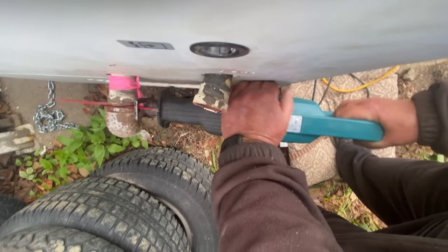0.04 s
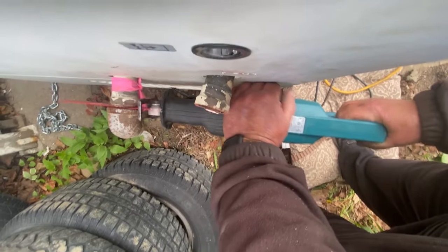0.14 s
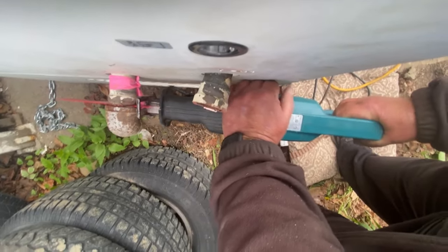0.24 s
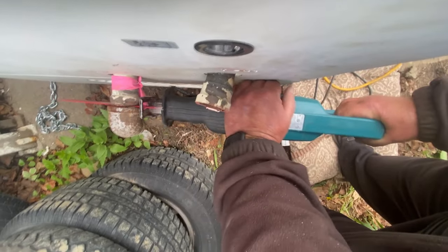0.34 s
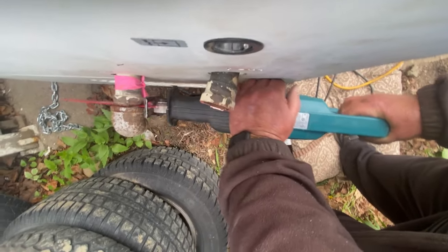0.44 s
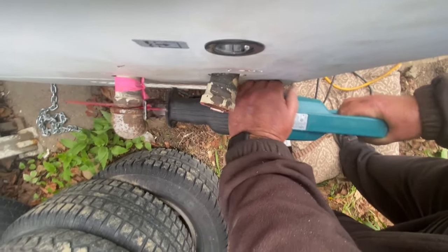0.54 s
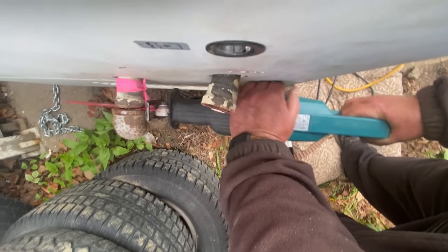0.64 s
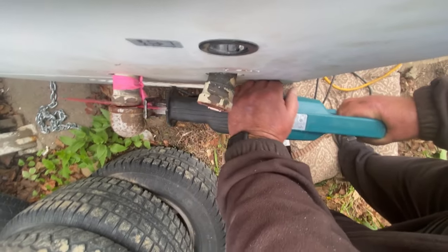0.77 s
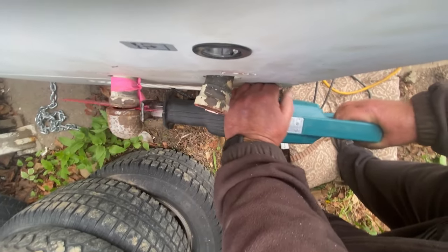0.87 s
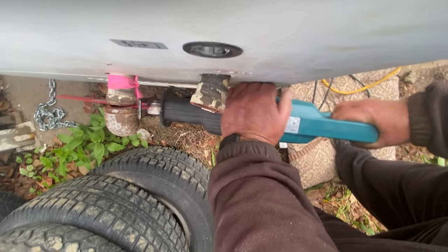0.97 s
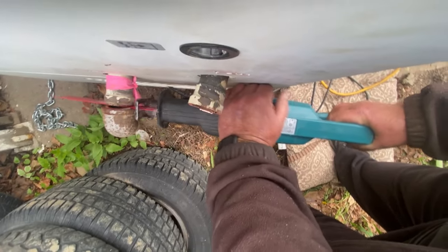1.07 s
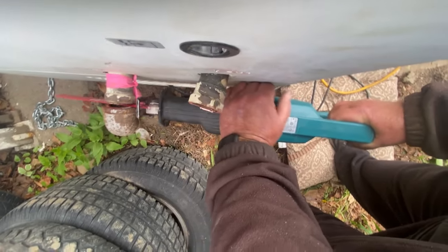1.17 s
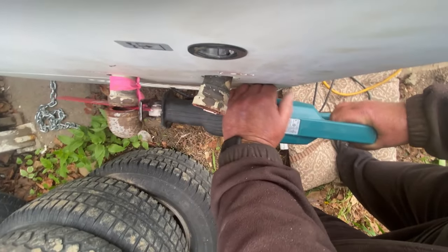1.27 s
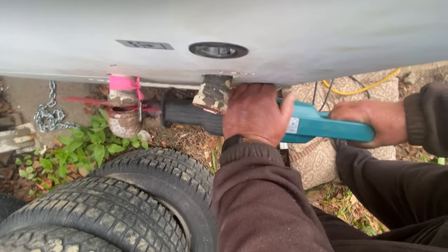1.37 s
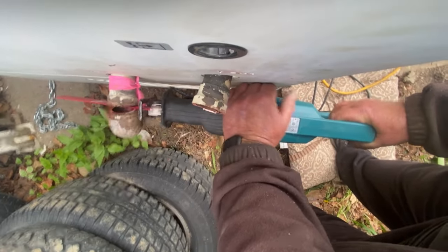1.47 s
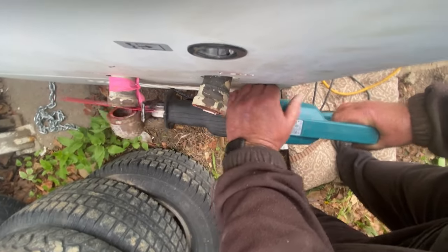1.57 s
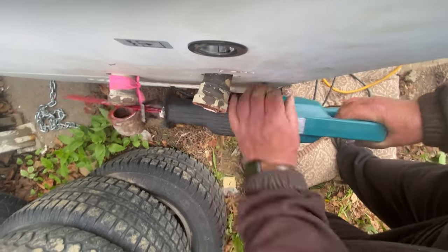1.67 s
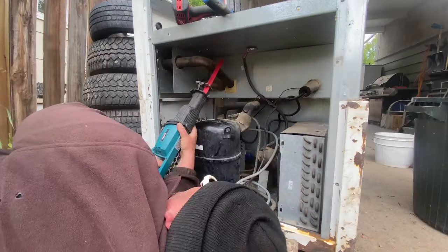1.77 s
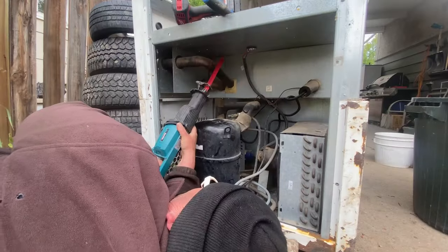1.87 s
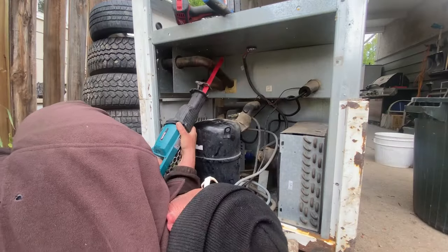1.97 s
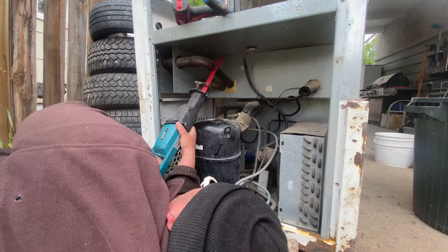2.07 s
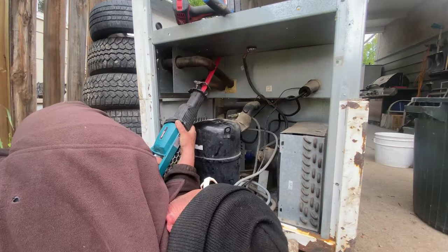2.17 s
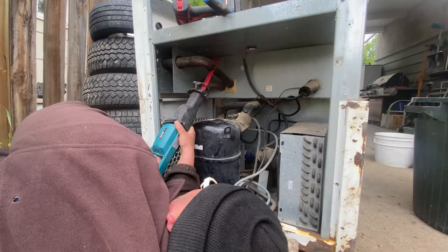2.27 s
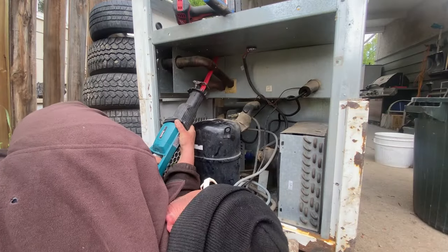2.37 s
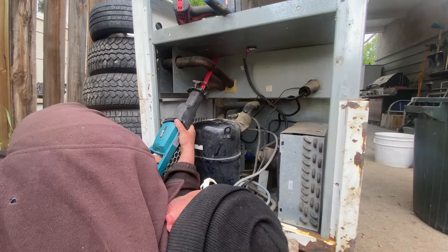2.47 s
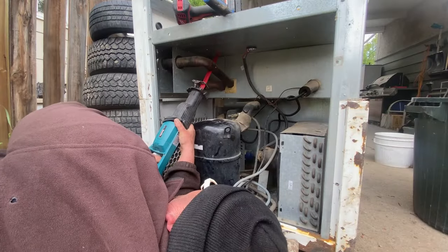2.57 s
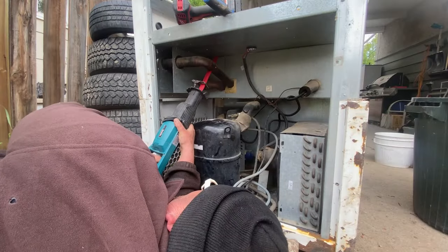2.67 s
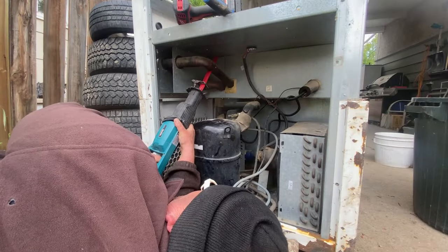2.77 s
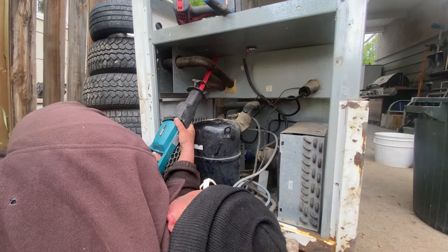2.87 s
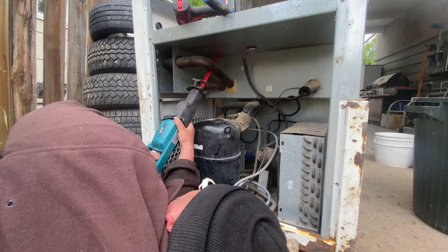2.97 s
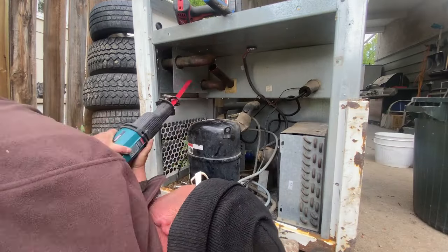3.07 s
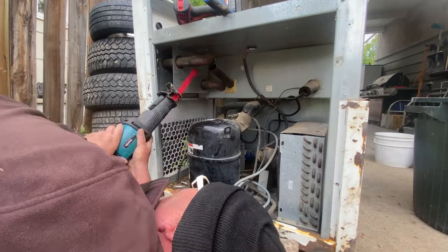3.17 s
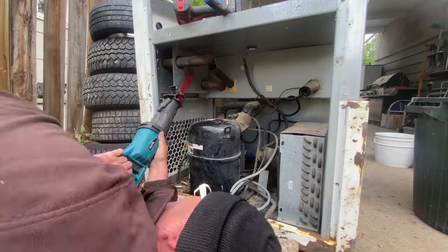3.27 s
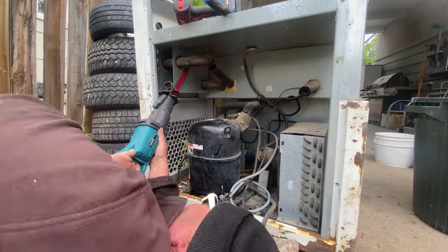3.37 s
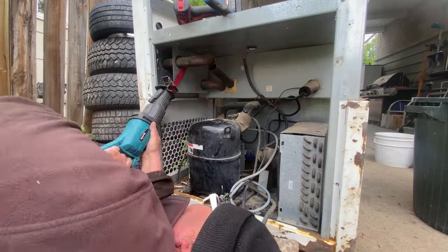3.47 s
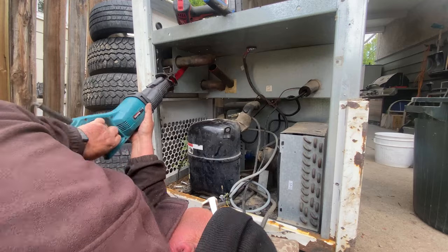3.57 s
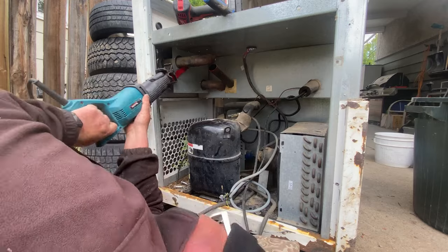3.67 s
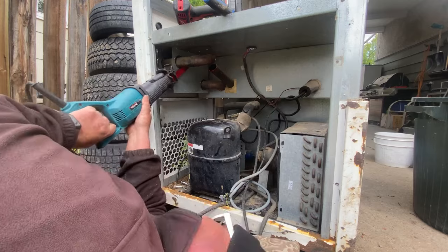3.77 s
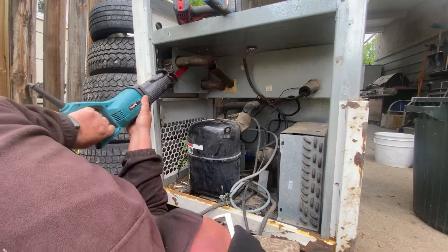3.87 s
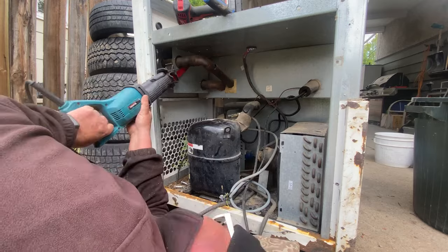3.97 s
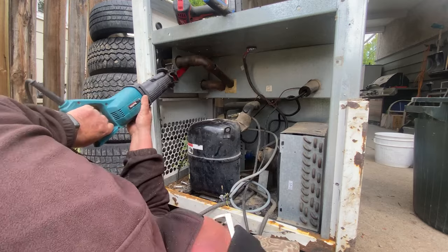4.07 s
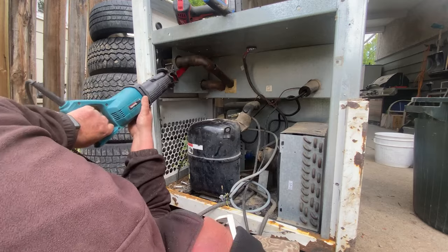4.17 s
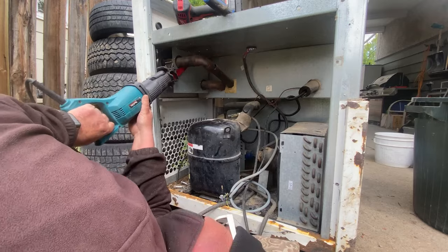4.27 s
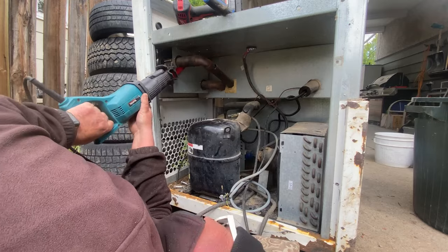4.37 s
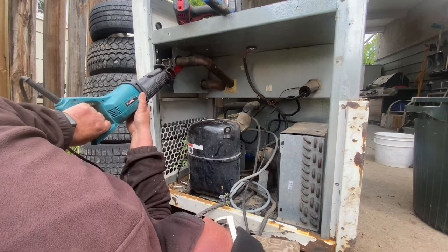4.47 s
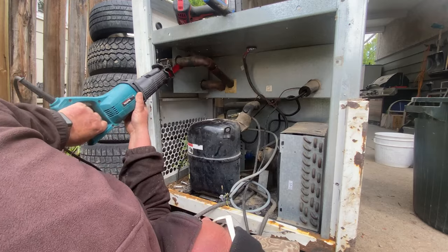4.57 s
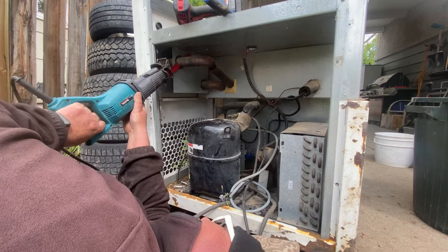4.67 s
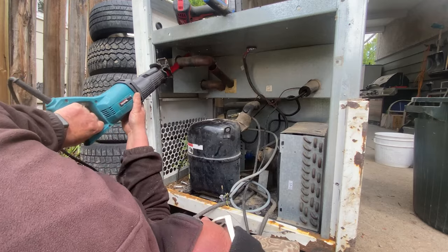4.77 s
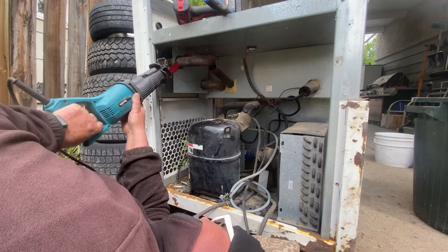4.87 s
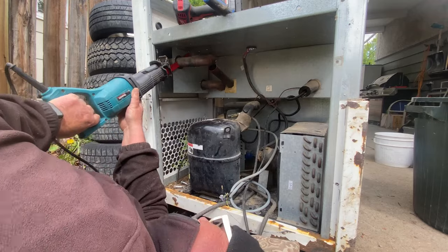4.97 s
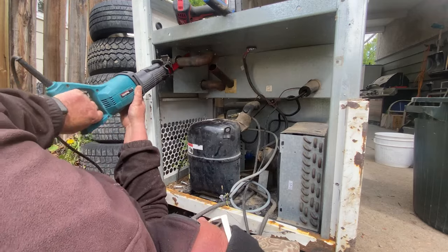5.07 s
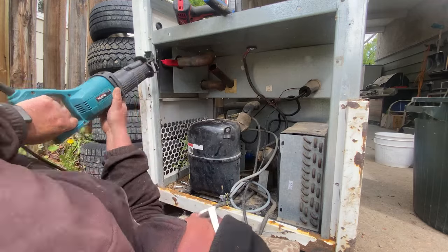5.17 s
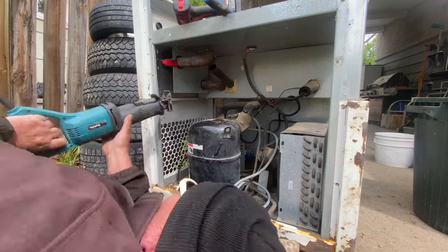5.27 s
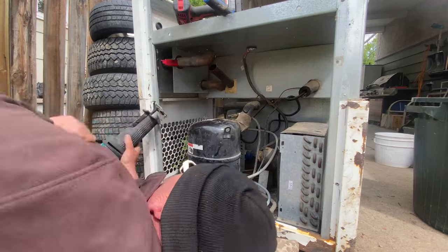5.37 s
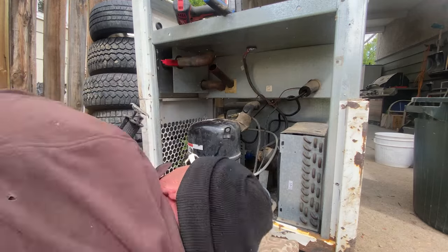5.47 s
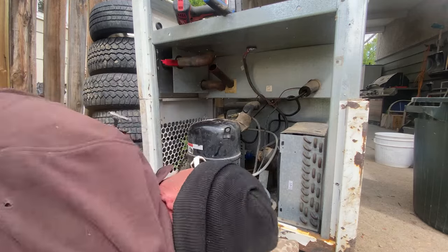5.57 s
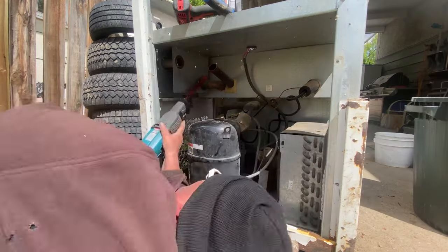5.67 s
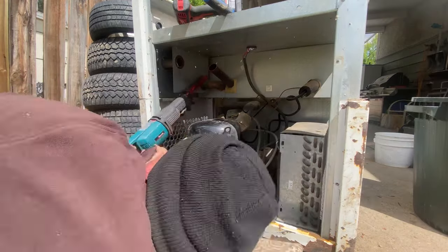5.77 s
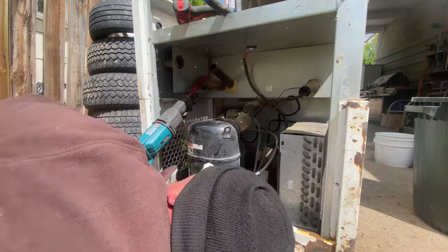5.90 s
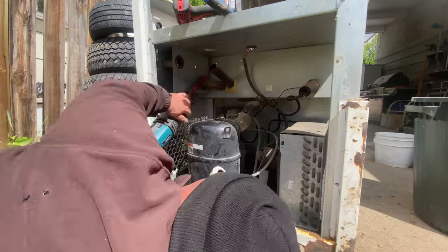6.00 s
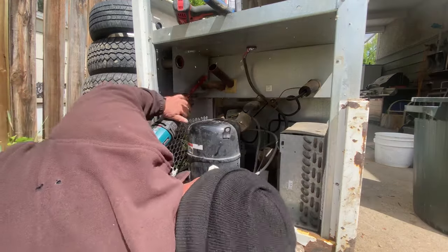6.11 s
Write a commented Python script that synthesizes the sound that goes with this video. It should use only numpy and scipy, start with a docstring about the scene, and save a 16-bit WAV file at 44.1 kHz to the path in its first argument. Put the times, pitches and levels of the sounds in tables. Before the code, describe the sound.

A power reciprocating saw buzzes and grinds through metal pipes in three bursts, with squeals, blade knocks, a whirring coast-down and abrupt cuts.

```python
"""A reciprocating saw, played back fast, cuts three metal pipes outdoors: first beside a tank, then twice in a
steel cabinet. Each stroke jolts the pipe into a buzz of overtones; the teeth grind and the motor hisses as
coloured, gritty noise, and bands of noise squeal. After a cut, rattle, brush hiss and fan air coast down.
Between cuts the blade scrapes, rings a hollow part and knocks on metal; abrupt cut-offs leave short silences."""
import sys
import numpy as np
from scipy import signal
from scipy.fft import rfft, irfft, next_fast_len
from scipy.io import wavfile
from scipy.ndimage import uniform_filter1d

SR = 44100
rng = np.random.default_rng(int(sys.argv[2]) if len(sys.argv) > 2 else 0)


def int16_out(signal):
    """Quantize to a 16-bit WAV file."""
    q = np.round(np.clip(np.atleast_2d(signal).T, -1, 1) * 32767)
    wavfile.write(sys.argv[1], SR, q.astype(np.int16))


N = 270774  # length in samples


def amp(db):
    """Turns decibels into a gain."""
    return 10 ** (np.asarray(db) / 20)


def evened(x):
    """Scales each row to rms 1."""
    return x / np.sqrt(np.mean(x ** 2, axis=-1, keepdims=True) + 1e-20)


def read(points, hz, column=1):
    """Reads a table column at any frequency, interpolating along log frequency."""
    table = np.transpose(points)
    return np.interp(np.log(hz + 1), np.log(table[0] + 1), table[column])


def unfold(rows):
    """Start time, and every other column at each sample."""
    s, *columns = np.transpose(rows)
    t = np.arange(s[0], s[-1], 1 / SR)
    return s[0], [np.interp(t, s, column) for column in columns]


def faded(x, samples=90):
    """Softens both ends."""
    i = np.arange(x.shape[1])
    return x * np.minimum(1, np.minimum(i, i[::-1]) / samples)


def add(mix, s, sound):
    """Lays a sound into the mix from s seconds, trimmed at the end."""
    part = mix[:, round(s * SR):][:, :sound.shape[1]]
    part += sound[:, :part.shape[1]]


def drift(rows, n, per_s):
    """Random wander of rms about 1, with per_s new targets a second."""
    knots = rng.standard_normal((rows, 400))
    position = np.arange(n) * per_s / SR
    return np.array([np.interp(position, np.arange(400), k) for k in knots]) * np.sqrt(1.5)


def gritty(n, spread_db):
    """Two unrelated noises whose samples now and then jump, as teeth catch."""
    jumps = np.minimum(rng.exponential(1, (2, n)), 6)
    return rng.standard_normal((2, n)) * amp(spread_db * jumps)


def coloured(x, spectrum):
    """Filters x by the spectrum and scales it to rms 1."""
    size = next_fast_len(x.shape[1] + 2048)
    gain = amp(read(spectrum, np.fft.rfftfreq(size, 1 / SR)))
    return evened(irfft(rfft(x, size) * gain, size)[:, :x.shape[1]])


def patchy(x, depth_db):
    """Resonances come and go: random patches of colour over time and pitch."""
    z = signal.stft(x, nperseg=512)[2]
    patches = uniform_filter1d(rng.standard_normal(z.shape[1:]), size=3, axis=0)  # along pitch
    patches = uniform_filter1d(patches, size=14, axis=1)  # along time
    z = z * amp(depth_db * patches / patches.std())
    return evened(signal.istft(z, nperseg=512)[1][:, :x.shape[1]])


def resonate(x, hz, width):
    """One resonance: shifts hz down to zero, smooths, shifts back."""
    turn = np.exp(2j * np.pi * np.cumsum(hz * np.ones(x.shape[1])) / SR)
    r = np.exp(-np.pi * width / SR)
    return 2 * (turn * signal.lfilter([1 - r], [1, -r], x / turn)).real


# Buzz of each pipe: level/dB of multiples 1, 2, 3 .. of the stroke rate, relative to the buzz level.
TANK_BUZZ = [-40, -5.5, 4.5, 3, -2, -15.5, 0.5, -7.5, -13.5, -10, -8, -11.5, -7.5, -12, -5.5, -8.5, -6, -12,
             -8.5, -6.5]
FIRST_BUZZ = [-19, -18.5, -16.5, -11, 2.5, -17, -8.5, -13.5, -5, -11, -11, -9.5, -16, -23, -20.5, -13, -12,
              -14.5, -13]
SECOND_BUZZ = [-19.5, -12, -7, -13.5, 0.5, -9.5, -18, -13.5, -8, -11.5, -12.5]
MOST_LIFT_DB = 7.5


def buzz(s, hz, turns, buzz_db, balance, overtones):
    """One jolt a stroke excites the overtones; the pipe shifts, so each swells and slips in phase."""
    even_db, lift, _, rough = balance
    upper_db = np.minimum(lift * (even_db - buzz_db), MOST_LIFT_DB)
    n = len(hz)
    t = s + np.arange(n) / SR
    tone = np.zeros((2, n))
    for k, db in enumerate(overtones, start=1):
        tilt_db = upper_db / (1 + (6.3 / k) ** 8)  # reaches mainly multiples 7 and up
        level = amp(buzz_db + db + tilt_db + swell(t, k * hz) + 2.2 * drift(2, n, 6))
        slip = .012 * k * k + .06 * drift(2, n, 3) + rough * np.sqrt(k) * drift(2, n, 50)  # turns
        path = [[0], [rng.random()]]  # the second path has its own phase
        tone += np.sqrt(2) * level * np.cos(2 * np.pi * (k * turns + slip + path))
    return tone


# Colour of the teeth on each pipe: f/Hz, relative level/dB (per Hz).
TANK_GRIND = [(40, -48.5), (250, -39), (420, -17.5), (1300, -12), (2100, -11), (2950, -2.5), (4000, -10),
              (5000, -17), (9000, -50)]
FIRST_GRIND = [(110, -59), (200, -23.5), (800, -12.5), (1550, -11.5), (1900, -1.5), (2900, 0), (3700, 1.5),
               (7000, -3.5), (10000, -15)]
SECOND_GRIND = [(110, -62.5), (200, -23.5), (900, -9.5), (1400, -7.5), (2100, -0.5), (3300, -0.5),
                (6000, -3.5), (10000, -15.5)]


def teeth(grind_db, stroke, flutter, colour):
    """Grinding: gritty noise that surges with each stroke and flutters in level."""
    grit = gritty(len(stroke), 1.3) * (1 + 0.33 * stroke)
    return patchy(coloured(grit, colour), depth_db=2.1) * amp(grind_db - 2.0) * flutter


# Colour of motor fan and brushes at each place: f/Hz, relative level/dB (per Hz).
TANK_HISS = [(2350, -37), (4000, -8.5), (5710, -3), (9620, -1), (11400, -5.5), (15100, -4.5),
             (16200, -25.5), (16500, -59)]
CABINET_HISS = [(2350, -48), (4000, -19), (4860, 2), (6500, -1), (9790, 2), (14800, -0.5), (16200, -9),
                (16500, -44)]
FULL_GRIND_DB = -30.5  # below this grind level the hiss sinks with it


def motor(motor_db, grind_db, stroke, flutter, colour):
    """Fan and brush hiss: gritty noise that surges and flutters less than the teeth."""
    hiss_db = motor_db + np.minimum(grind_db - FULL_GRIND_DB, 0)
    grit = gritty(len(stroke), 2.0) * (1 + 0.18 * stroke)
    return patchy(coloured(grit, colour), depth_db=2.5) * amp(hiss_db - 0.42) * flutter ** 0.46


# Stretches of sawing: t/s, stroke rate f/Hz, buzz level/dB, grind level/dB (before trim and flutter).
TANK_CUT = [(0, 164.4, -45, -29.5), (.06, 165.4, -40, -21), (.28, 164.2, -37, -27),
            (.38, 159.7, -38, -28.5), (.47, 160.3, -39.5, -26.5), (.56, 166, -37, -26),
            (1.0, 165.6, -35, -25.5), (1.22, 167.4, -37.5, -24.5), (1.3, 171.6, -37, -23.5),
            (1.34, 157.5, -44.5, -29), (1.37, 153.1, -44.5, -30), (1.385, 149.1, -59.5, -60),
            (1.48, 137.3, -59, -70), (1.56, 127.8, -75, -80)]
FIRST_CUT = [
    [(1.729, 201, -59, -45), (1.742, 201, -38.5, -33), (1.804, 203.4, -37, -31.5), (1.822, 203.3, -86, -68)],
    [(1.879, 198.6, -37, -31), (2.04, 194.6, -38.5, -28), (2.3, 192.2, -42.5, -27),
     (2.6, 196.5, -40.5, -29.5), (2.79, 199.8, -44.5, -30.5), (2.95, 196.2, -46.5, -34.5),
     (3.07, 196.6, -45.5, -29), (3.105, 196, -67, -45)],
]  # two stretches
SECOND_CUT = [(3.73, 196.4, -80, -58), (3.82, 198.2, -77, -46), (3.9, 194.4, -66, -38.5),
              (3.94, 195.5, -59, -30), (4.05, 200.8, -52, -24.5), (4.3, 202.6, -40.5, -21.5),
              (4.43, 192.6, -46.5, -31.5), (4.5, 200.5, -48, -29.5), (4.75, 206.2, -47.5, -30),
              (5.145, 209.9, -52.5, -32), (5.165, 212, -74, -44), (5.21, 210, -83, -54)]
# Each cut: buzz level/dB where upper overtones get no lift, their lift in dB for each dB the buzz sinks,
# motor hiss level/dB at full grind (before trim and flutter), phase roughness/turns.
TANK_BALANCE = (-35, 2, -32, 0.02)
FIRST_BALANCE = (-39.5, 1.5, -29, 0.03)
SECOND_BALANCE = (-50.5, -2.8, -29.5, 0.1)


def saw(rows, balance, overtones, grind, hiss):
    """Buzz, grind and hiss of one stretch share strokes; two like-sounding rows, as heard along two paths."""
    s, (hz, buzz_db, grind_db) = unfold(rows)
    n = len(hz)
    turns = np.cumsum(hz * (1 + .002 * drift(1, n, 58.2)[0])) / SR
    flutter = amp(1.54 * drift(1, n, 45.38))  # quick and random
    stroke = np.exp(0.8 * np.cos(2 * np.pi * turns))  # teeth cut hardest at the jolt
    tone = buzz(s, hz, turns, buzz_db, balance, overtones)
    grinding = teeth(grind_db, stroke, flutter, grind)
    hissing = motor(balance[2], grind_db, stroke, flutter, hiss)
    return s, faded(tone + grinding + hissing)


# Bands of noise, narrow to broad, steady or sliding (squeals, a low thump, lingering hiss):
# start t/s, end t/s, start f/Hz, end f/Hz, width f/Hz, level/dB (before flutter and fades).
SQUEALS = [(0.019, 0.304, 2500, 2500, 510, -31.5), (1.75, 1.82, 6140, 5960, 300, -31),
           (.05, 0.2, 160, 180, 39, -48.5), (1.5, 1.6, 320, 385, 16, -56),
           (5.3, 5.63, 7800, 9100, 1600, -55), (1.879, 2.332, 6200, 6130, 420, -29),
           (1.922, 2.1, 5330, 5100, 250, -34.5), (1.987, 2.16, 12140, 11500, 400, -33.5),
           (2.125, 2.335, 10500, 9500, 500, -35.5), (2.199, 2.305, 4500, 4300, 149, -33.5),
           (2.353, 2.604, 10700, 8100, 300, -38), (2.396, 2.57, 4850, 4640, 300, -33),
           (2.664, 3.06, 10250, 10000, 350, -36), (2.656, 2.918, 3000, 3400, 130, -39.5),
           (5.046, 5.167, 1960, 1830, 530, -35.5), (3.745, 4.42, 3300, 3530, 420, -32),
           (3.91, 4.43, 1970, 2040, 800, -26.5), (3.95, 4.428, 9700, 9730, 400, -36),
           (4.355, 4.632, 12300, 11600, 600, -33)]


def squeal(s, end, start_hz, end_hz, width, db):
    """Fluttering noise through one resonance, passed twice, that holds its pitch or slides."""
    n = round((end - s) * SR)
    hz = np.linspace(start_hz, end_hz, n)
    grit = np.diff(gritty(n, 2.5), 2, prepend=0, append=0)  # differencing thins the lows
    ring = resonate(resonate(grit, hz, width), hz, width)
    return s, amp(db + 1.6 * drift(1, n, 40)) * evened(ring) * signal.windows.tukey(n, .2)


# Buzz bands that swell or sink as the pipe shifts: start t/s, end t/s, centre f/Hz, width f/Hz,
# level change/dB at the centre.
SWELLS = [(.32, .52, 1290, 100, 9.5), (.32, .52, 1120, 66, -10), (2.67, 2.97, 1940, 430, 8),
          (2.3, 3.08, 3700, 120, 11.5), (4.93, 5.16, 720, 100, 11), (2.823, 3.107, 1000, 150, -8.5),
          (4.97, 5.2, 1040, 100, -6), (4.52, 4.98, 1255, 150, 7.5)]
SWELL_S = 0.042  # ramp in and out


def swell(t, hz):
    """Extra dB at each moment for an overtone that runs along hz."""
    total_db = 0
    for start, end, centre_hz, width, db in SWELLS:
        if start < t[-1] and end > t[0]:
            ramp = np.interp(t, [start, start + SWELL_S, end - SWELL_S, end], [0, 1, 1, 0])
            total_db = total_db + db * np.exp(-((hz - centre_hz) / width) ** 2) * ramp
    return total_db


# Motor coasting after a cut: (start t/s, end t/s), then for gear rattle, brush hiss and fan air
# (start level/dB, fall/dB, bend: 1 even, more = late).
COASTS = [((1.368, 1.733), (-40.5, 21, 3.7), (-38.5, 30, 4.6), (-35.5, 25.8, 4.2)), ((5.16, 5.645),
          (-49.5, 22, 0.53), (-42, 29, 1.27), (-33.5, 23, 0.92))]
# Colour of each coasting layer: f/Hz, relative level/dB (per Hz).
RATTLE = [(120, -34), (400, -3.5), (1200, -7), (3200, -3.5), (4500, -4), (6000, -33)]
BRUSHES = [(3000, -33), (4500, -3.5), (9000, 0), (11000, -11)]
AIR = [(7000, -56), (9500, 8), (15500, 10.5)]


def coast(span, *layers):
    """Gears, brushes and fan die away as gritty noises, each at its own pace."""
    s, end = span
    n = round((end - s) * SR)
    gone = np.linspace(0, 1, n)
    out = np.zeros((2, n))
    for (db, fall_db, bend), colour in zip(layers, (RATTLE, BRUSHES, AIR)):
        noise = patchy(coloured(gritty(n, 3.6), colour), depth_db=3.0)
        out += noise * amp(db - fall_db * gone ** bend + 1.8 * drift(1, n, 65.7))
    return s, faded(out)


# Knocks of blade on metal: t/s, peak level/dB of the first path, treble level/dB, low ring level/dB,
# nominal 60 dB decay t/s (never under 0.01).
KNOCKS = [(3.0746, -19, 13, -10, 0.02), (3.0832, -9.5, 15, -13, 0.024), (3.282, -43, -9, -19.5, .04),
          (3.302, -49, -16, -34, .04), (3.361, -39.5, -7, -18, 0.07), (3.379, -45, -14, -20, .05),
          (3.41, -49, -23, -30, 0.059), (3.449, -44.5, -9.5, -31, .038), (3.485, -44, -13, -14, 0.052),
          (3.543, -48, -24, -0.5, .05), (3.654, -31, -29, 0, 0.16), (3.674, -23, -15, -1, 0.064),
          (3.686, -20.5, -37, -6, 0.046), (3.738, -29, -24, 1, 0.079), (3.858, -17, -26, -27, 0.052),
          (3.923, -13, -19, -35, 0.05), (5.092, -26.5, 0, -15, .03), (5.145, -20.5, 4.5, -15, 0.045),
          (5.645, -36, -17, -28, 0.059), (5.652, -27.5, -7.5, -31, 0.057),
          (5.666, -40.5, -17, -16.5, 0.054), (5.767, -33.5, -11.5, 8.5, 0.023),
          (5.788, -26.5, -4, -9, 0.066), (5.801, -23.5, 1.5, -3, 0.046), (5.814, -31, -15, 0, 0.033),
          (5.827, -21.5, 15, -23, 0.062), (5.858, -25, 7, -3.5, 0.05), (5.896, -43.5, -20, 6, .04),
          (5.963, -31, 18, -9, .051), (6.039, -25, 6, -17, 0.061), (6.07, -28.5, 3, -18, 0.1),
          (6.126, -33.5, 2, -19, .06)]
# Broad resonances of the metal: f/Hz, width f/Hz, relative level/dB.
METAL = [(712, 140, -1), (1153, 240, 6.5), (2060, 320, 6.5), (2595, 154, 13.5), (3397, 360, 8.5),
         (4850, 500, -2), (7400, 1140, -1), (9760, 790, -0.5), (12000, 600, -7)]


def knock(s, db, treble_db, low_db, t60):
    """A dying chatter through the metal's broad resonances; the treble dies first."""
    t = np.arange(4000) / SR
    decays = t / max(t60, .01)
    chatter = gritty(len(t), 1.45) * np.minimum(t / 0.0012, 1)
    out = np.zeros((2, len(t)))
    for hz, width, mode_db in METAL:
        colour_db = treble_db if hz > 6000 else low_db if hz < 2800 else 0
        dying = chatter * amp(-60 * decays * (hz / 3400) ** 0.18)
        ring = resonate(resonate(dying, hz, width), hz, 2.25 * width)
        out += amp(mode_db + colour_db) * evened(ring)
    crack = 3.1 * np.diff(chatter, 2, prepend=0, append=0)  # bare, bright
    out += amp(treble_db - 3.0 - 95 * decays) * crack
    return s, amp(db) * out / abs(out[0]).max()


# Idle blade dragged over metal, one table a stretch: t/s, level/dB (before the spurts).
SCRAPES = [
    [(3.104, -69), (3.13, -79), (3.2, -67), (3.33, -74), (3.64, -56), (3.76, -53.5), (3.82, -58)],
    [(5.746, -62.5), (5.8, -51), (5.87, -55), (5.92, -60.5), (6.14, -62)],
]
# Colour of the scrape, and of the flatter, more even-coloured drag at the end: f/Hz, relative level/dB (per Hz).
SCRAPE = [(120, -24), (400, -3), (1000, -15), (2000, -12), (2800, 1.5), (3600, -6.5), (4500, -24),
          (12000, -30), (16000, -45.5)]
DRAG = [(71, -59), (120, -30), (327, -1), (1210, -11.5), (1580, -12), (3050, -7), (3520, -17), (11100, -20),
        (16000, -16)]


def scrape(rows, colour):
    """Gritty friction in spurts."""
    s, (db,) = unfold(rows)
    n = len(db)
    spurts = amp(db + 2.6 * drift(1, n, 95))
    return s, faded(spurts * coloured(gritty(n, 2.7), colour))


# The drag sets a hollow part ringing: start t/s, end t/s, level/dB (before flutter and fades).
RINGING = [(3.487, 3.801, -57), (5.754, 5.888, -57)]
# Hollow ring under the scrape: f/Hz, width f/Hz of each of two passes.
HOUSING = (1196, 130)


def hollow(s, end, db):
    """Friction in one hollow resonance."""
    n = round((end - s) * SR)
    ring = evened(resonate(resonate(gritty(n, 6.1), *HOUSING), *HOUSING))
    return s, amp(db + 4.5 * drift(1, n, 65)) * ring * signal.windows.tukey(n, .25)


# Stereo picture: f/Hz, side minus mid level/dB, share of side in phase with mid, share a quarter cycle off
# (the two shares together are held to 1).
BESIDE_TANK = [(99, 7, -0.05, .02), (340, 0.5, -0.82, -0.0063), (578.3, 10, -1.2, 0.84),
               (1295, 6, -0.57, -0.0023), (2450, 4.5, -0.66, 0.64), (3550, 3.5, -0.67, 0.41),
               (5020, 0.6, 0.21, -.23), (9000, -.7, -0.42, -.05), (13860, -3, -.19, .08)]
IN_CABINET = [(160, -7, -0.93, -1.07), (607, -2.1, -1.01, -0.34), (1575, -2.5, -0.95, 0.27),
              (2450, 1, -0.85, 0.24), (3550, 4.5, -0.11, 0.25), (5020, 1.5, -0.015, .63),
              (7140, -2.5, 0.14, .6), (10160, -2, 0.04, .18), (13860, 1.5, -0.042, .09)]
MOVE_S = 1.726  # from the tank to the cabinet
# Mono below a boundary, which holds and then slides down: start t/s, hold until t/s, boundary f/Hz.
MONO_BELOW = [(1.728, 1.76, 1600), (3.12, 4.25, 6800), (5.645, 6.2, 6800)]
SLIDE_OCTAVES_PER_S = 11


def stereo(paths):
    """Row one is the middle; the side is partly the same sound, partly the other path."""
    hz, t, (mid, other) = signal.stft(paths, SR, nperseg=512, noverlap=384)
    side = np.zeros_like(mid)
    for place, here in ((BESIDE_TANK, t < MOVE_S), (IN_CABINET, t >= MOVE_S)):
        alike = read(place, hz, column=2) + 1j * read(place, hz, column=3)
        alike = (alike / np.maximum(abs(alike), 1))[:, None]
        unlike = np.sqrt(abs(1 - abs(alike) ** 2))
        side += here * amp(read(place, hz))[:, None] * (alike * mid + unlike * other)
    for s, until, boundary_hz in MONO_BELOW:
        slide = 2 ** (-SLIDE_OCTAVES_PER_S * np.maximum(t - until, 0))
        side *= hz[:, None] >= (t > s) * boundary_hz * slide
    left_right = np.array([mid + side, mid - side])
    return signal.istft(left_right, SR, nperseg=512, noverlap=384)[1][:, :N]


def scene():
    """Mixes the three cuts and the sounds around them, then spreads them in stereo."""
    mix = np.zeros((2, N))
    add(mix, *saw(TANK_CUT, TANK_BALANCE, TANK_BUZZ, TANK_GRIND, TANK_HISS))
    for rows in FIRST_CUT:
        add(mix, *saw(rows, FIRST_BALANCE, FIRST_BUZZ, FIRST_GRIND, CABINET_HISS))
    add(mix, *saw(SECOND_CUT, SECOND_BALANCE, SECOND_BUZZ, SECOND_GRIND, CABINET_HISS))
    for rows, colour in zip(SCRAPES, (SCRAPE, DRAG)):
        add(mix, *scrape(rows, colour))
    for source, table in ((squeal, SQUEALS), (coast, COASTS), (knock, KNOCKS), (hollow, RINGING)):
        for row in table:
            add(mix, *source(*row))
    return stereo(mix)


# An abrupt silence: start t/s, end t/s.
SILENT = (5.69, 5.745)
EDGE_HZ = 16000  # upper band limit


def record(dry):
    """Mutes the silence, rounds off peaks softly, then limits the band."""
    t = np.arange(N) / SR
    heard = (t < SILENT[0]) | (t > SILENT[1])
    rounded = .95 * np.tanh(dry * heard / .95)
    lowpass = signal.firwin(511, EDGE_HZ, window=("kaiser", 9), fs=SR)
    return signal.oaconvolve(rounded, lowpass[None], "same", axes=1)


dry = scene()
out = record(dry)
int16_out(out)
```